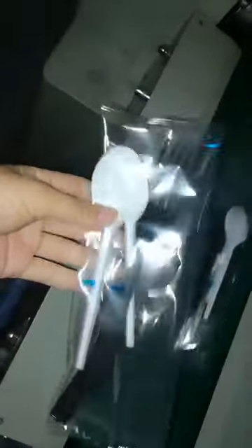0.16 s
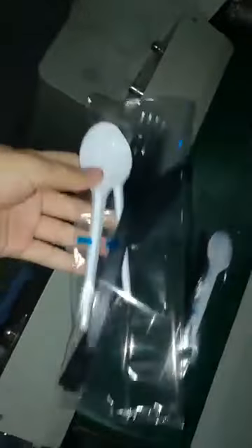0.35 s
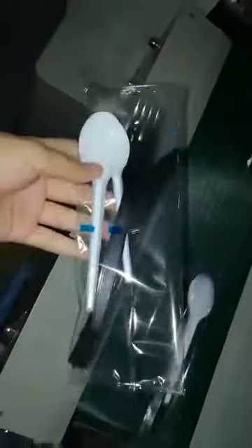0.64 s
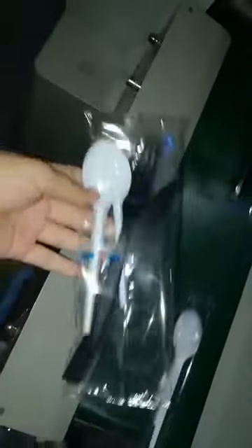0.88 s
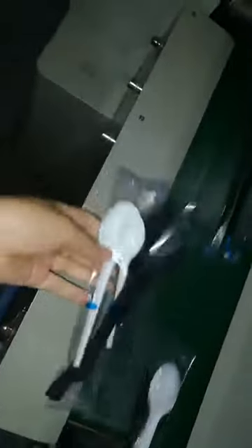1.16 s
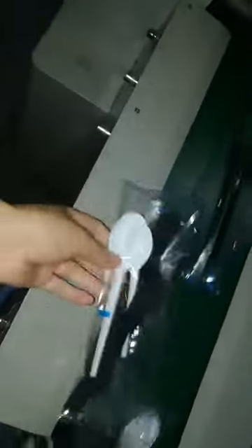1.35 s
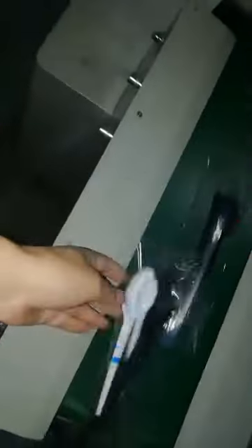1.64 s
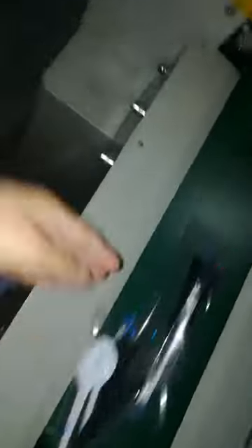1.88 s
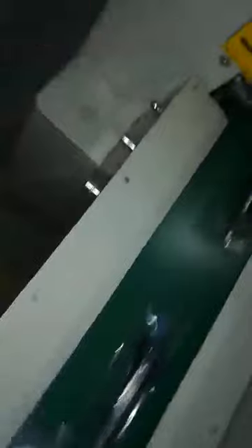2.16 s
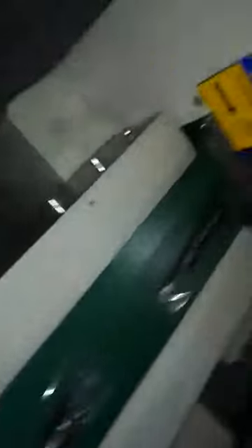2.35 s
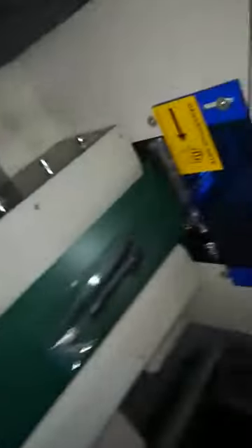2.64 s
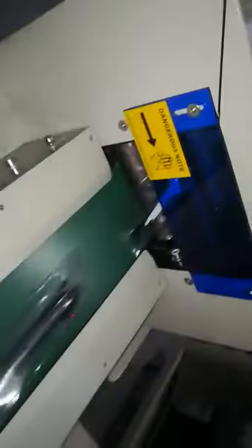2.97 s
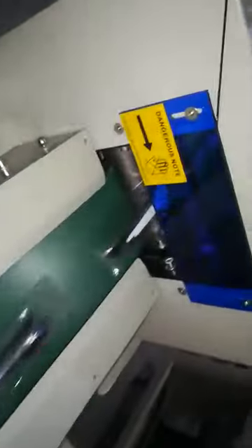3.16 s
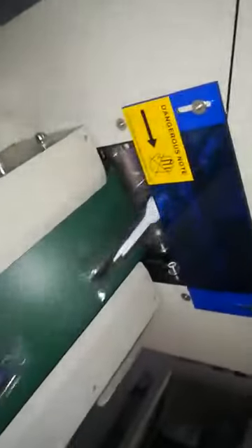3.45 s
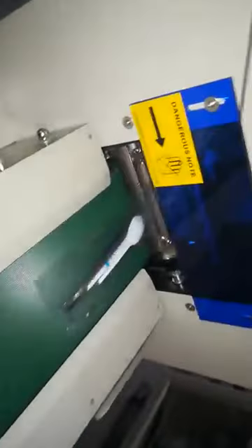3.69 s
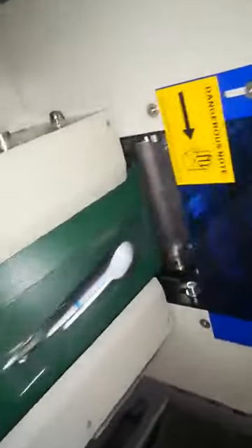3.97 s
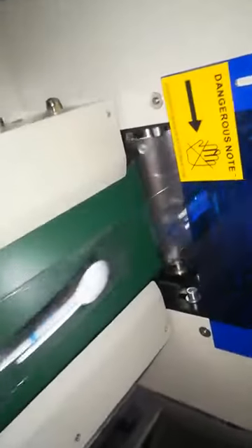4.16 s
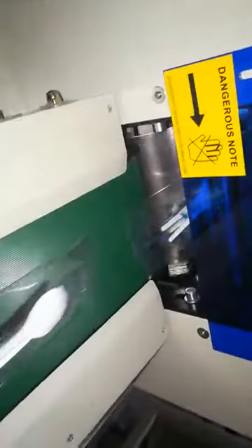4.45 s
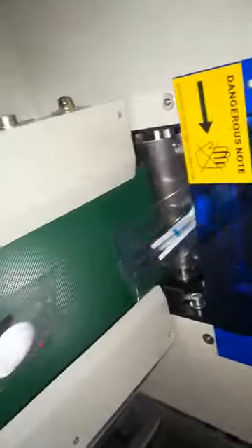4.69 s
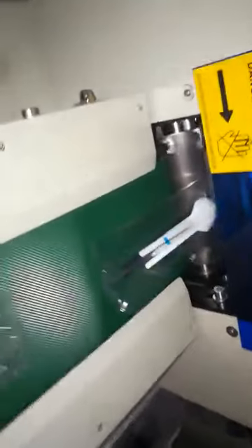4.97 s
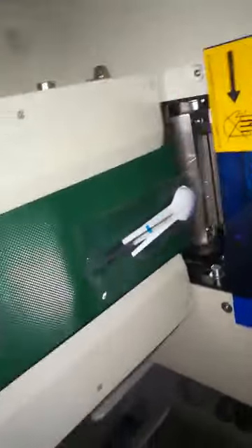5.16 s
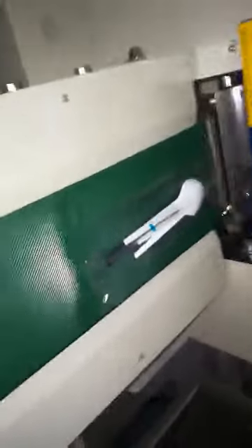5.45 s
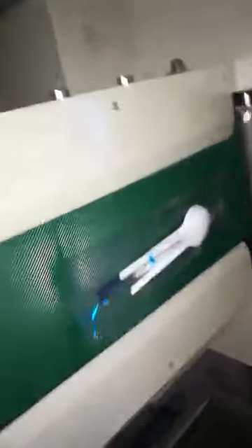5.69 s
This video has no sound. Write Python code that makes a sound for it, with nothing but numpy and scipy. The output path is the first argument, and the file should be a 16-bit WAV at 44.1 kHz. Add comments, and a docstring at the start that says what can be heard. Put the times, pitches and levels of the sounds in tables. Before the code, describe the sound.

Indoors, a handheld stereo phone is close above a packaging machine's belt. At 0.1 s a hard, rattling metal clack rings briefly. A fine bright air hiss runs throughout over rustling chains and rollers, a wavering low motor hum and a thin, very high electrical whine. A glassy band in the hiss rises and fades over the first 1.6 s as the hiss softens. Film crinkles faintly near 1.3 s; at 1.5 s a pack lands with short soft scuffs. From 2 to 3.5 s film drags roughly through rollers, with a snap and faint knock at 2.8 s. A quieter lull follows. Around 4.2 s hiss and rubbing surge and a broad, full roar sets in quickly; film snaps at 4.4 s, and from 4.5 to 4.9 s metal squeals in jumping high chirps that ring on. Another snap comes at 5 s, a light knock at 5.3 s, while the roar slowly eases to the end.

```python
"""A flow-wrap machine seals plastic cutlery in film, heard from a hand-held phone above its out-feed belt.
Air hisses and film rubs through the rollers, both made of coloured noise and random grains.
A hard clack opens the scene, a pack is laid on the belt, film snaps, and a rubbing metal part squeals briefly.
Behind them the gear rustles, the motor hums and the inverter whines, as noise bands and wandering sines;
a broad roar of noise joins in after four seconds. The phone has two microphone ports, left and right."""
import sys
import numpy as np
from scipy import signal
from scipy.fft import rfft, irfft
from scipy.io import wavfile
from scipy.ndimage import uniform_filter1d, minimum_filter1d

SR = 44100
rng = np.random.default_rng(int(sys.argv[2]) if len(sys.argv) > 2 else 0)


def to_wav(sig):
    """Store sig (one row per channel, or 1-D mono) as 16-bit WAV at the path in sys.argv[1].

    Samples outside -1..1 are clipped; the rate is SR.
    """
    pcm = np.clip(np.atleast_2d(sig), -1, 1) * 32767
    pcm = np.round(pcm).astype(np.int16)
    wavfile.write(sys.argv[1], SR, pcm.T)  # frames by channels


N = 256662
T = np.arange(N) / SR  # time in s

# spectrum of the escaping air, shape only: columns hz, density_db (per Hz)
AIR_SPECTRUM = [(1000, -17), (1700, -8.5), (2100, -2.5), (2700, -1), (4300, -1.5), (5200, -2), (5800, 6.5),
                (6600, -2), (8400, -1), (9600, -3.5), (11500, -9.5), (13200, -12.5), (15500, -27)]


def air():
    """Escaping air: a fine turbulent hiss with a little spatter."""
    spatter = undb(-8.5) * grains(rate=1500, spread_db=3.5)
    jet = from_left(noise() + spatter)
    low_skirt = [(100, -85), (500, -60)]
    hiss = colour(from_left(jet), low_skirt + list(AIR_SPECTRUM))
    return panels(hiss) * undb(0.72 * walk(45))


# bright band of the hiss: columns time_s, centre_hz, level_db
SHEEN_PATH = [(0, 6400, -32), (0.9, 8460, -41.5), (1.6, 8600, -51), (3.8, 8500, -57)]


def sheen():
    """A bright band of the hiss climbs and fades while the pack is turned in the hand."""
    centre_hz, level_db = curves(SHEEN_PATH)
    return undb(level_db) * band(centre_hz, width_hz=1600)


# spectrum of the rubbing film, shape only: columns hz, density_db (per Hz)
FILM_SPECTRUM = [(1500.0, -22.5), (2900.0, -13.5), (3550.0, -1.5), (4200.0, -5), (4900.0, 1), (5700.0, -1),
                 (6200.0, -8.5), (7600.0, -30), (12000.0, -27.5)]


def film():
    """Film dragged over steel: dense little slips, uneven in strength."""
    clicks = undb(-3.5) * grains(rate=3000, spread_db=4.5)
    slips = from_left(noise() + clicks)
    rubbing = colour(from_left(slips), [(600, -32)] + list(FILM_SPECTRUM))
    return panels(rubbing) * undb(1.0 * walk(45))


# packs dragged through the rollers: columns start_s, end_s, level_db
FILM_DRAGS = [(2.002, 2.42, -39), (2.371, 2.704, -34), (2.647, 3.547, -29.5), (2.8, 2.845, -25.5),
              (4.234, 5.3, -31.5), (4.455, 4.62, -34), (5.287, 5.357, -24), (5.645, 5.82, -32)]
FILM_IDLE_DB, DRAG_RISE_S, DRAG_FALL_S = -38, 0.034, 0.076


def drag():
    """Strength of the film's rubbing: the drags add their power to the light idle rub."""
    pulls = sum((undb(db) * swell(start, end, DRAG_RISE_S, DRAG_FALL_S)) ** 2
                for start, end, db in FILM_DRAGS)
    return np.sqrt(undb(FILM_IDLE_DB) ** 2 + pulls)


# the air jet as the phone moves about it: columns time_s, hiss_db, left_minus_right_db
JET_PATH = [(0, -28, -2), (0.8, -30, -2.5), (1.35, -32, -2.5), (1.65, -34.5, -3), (2.0, -32.5, 0),
            (2.6, -30, -1.5), (3.45, -30, 0), (3.75, -34.5, 2), (4.12, -35, 1.5), (4.24, -28, 5),
            (4.7, -28, -3.5), (5.82, -28, 0.5)]


def hiss():
    """Air jet and film rub share one shifting balance between the ports."""
    air_db, lean_db = curves(JET_PATH)
    return (undb(air_db) * air() + drag() * film()) * balance(lean_db)


# knocks on the frame: columns start_s, level_db (relative), rattle_t60_s, treble_db (relative to its body)
FRAME_KNOCKS = [(0.117, -9.5, 0.052, -17), (0.1202, -12, 0.05, -11), (0.1262, -6.5, 0.05, -5),
                (0.141, -19, 0.054, -2), (0.191, -20.5, 0.14, -19), (2.8047, -24, 0.19, -15),
                (5.33, -25, 0.11, -3)]
# ringing of the frame after a knock: columns pitch_hz, level_db (relative), t60_s
FRAME_RINGING = [(425, -42, .6), (840, -42, .45), (1513, -39, .3), (2842, -33, .3), (8856, -36, .4)]
# spectrum the frame gives to the rattle, shape only: columns hz, gain_db
FRAME_SPECTRUM = [(250, -33), (420, -23), (620, -16), (840, -2), (1250, -14), (1550, -3), (1850, -9),
                  (2250, -3), (3250, -1), (5200, 2.5), (6500, -11), (8500, -10), (15500, -37)]
# where the frame is heard: columns hz, left_minus_right_db
FRAME_BALANCE = [(500, 4), (2100, -2), (5200, 4.5), (12000, -1)]


def knocks():
    """Each knock is a short rattle of contacts that sets the steel frame ringing."""
    blows, strikes = 0, np.zeros(N)
    rattle = unit(noise() + undb(-5.5) * grains(rate=6800, spread_db=2.9))
    treble = colour(rattle, [(5000, -58), (7500, 16.5)])
    body = colour(rattle, [(5700, -1.0), (8000, -8)])
    for start, db, t60, treble_db in FRAME_KNOCKS:
        blows = blows + undb(db) * decay(start, t60) * (body + undb(treble_db) * treble)
        strikes[int(start * SR)] += undb(db)
    ring = sum(undb(db) * decay(0, t60) * np.sin(2 * np.pi * hz * T) for hz, db, t60 in FRAME_RINGING)
    clatter = undb(5.0) * colour(blows, FRAME_SPECTRUM)
    return lean(room(clatter + convolve(strikes, ring), wet_db=-13.0), FRAME_BALANCE)


# modes of the rubbing metal part: columns pitch_hz, left_minus_right_db
RUBBING_MODES = [(3425, -7), (5165, 7), (5726, 4), (8162, 9), (8800, -5), (11612, -4), (12172, -6),
                 (12834, -6)]
# squeals, each on one of those modes: columns start_s, end_s, pitch_hz, level_db
SQUEAL_EVENTS = [(4.472, 4.535, 5726, -23), (4.472, 4.555, 3425, -30), (4.526, 4.59, 8800, -21.5),
                 (4.526, 4.555, 12172, -35), (4.526, 4.555, 12834, -38), (4.5, 4.595, 5165, -28.5),
                 (4.575, 4.66, 5726, -24), (4.595, 4.645, 8162, -20), (4.672, 4.71, 8162, -20),
                 (4.68, 4.76, 3425, -34), (4.72, 4.81, 11612, -38), (4.727, 4.768, 8162, -18),
                 (4.745, 4.785, 5165, -33), (4.74, 4.87, 5726, -31)]
# ringing after a squeal, against the squeal's level; the level is that at 5 kHz
SQUEAL_RING_DB, SQUEAL_RING_DB_PER_OCTAVE, SQUEAL_RING_T60_S = -8, -4, 1.6


def squeal(rise_s=0.008, fall_s=0.017):
    """Friction locks on to mode after mode; each swells, flutters and rings on, high ones more softly."""
    out = 0
    for hz, lean_db in RUBBING_MODES:
        ring = undb(SQUEAL_RING_DB + SQUEAL_RING_DB_PER_OCTAVE * np.log2(hz / 5000))
        strengths = []
        for start, end, mode_hz, db in SQUEAL_EVENTS:
            if mode_hz == hz:
                driven = swell(start, end, rise_s, fall_s)
                released = ring * decay(end, SQUEAL_RING_T60_S)
                strengths.append(undb(db) * np.maximum(driven, released))
        flutter = undb(2.2 * walk(55))
        tone = np.max(strengths, axis=0) * flutter * sine(hz + 12 * walk(120))
        out = out + tone * balance(lean_db)
    return room(out, wet_db=-13)


# crisp snaps of the film: columns start_s, level_db, t60_s
FILM_SNAPS = [(2.822, -31, 0.088), (4.3656, -29, 0.12), (4.9822, -24, .03)]
# softer crinkling of the film: columns start_s, end_s, level_db
FILM_CRINKLES = [(1.267, 1.38, -38), (4.151, 4.465, -33), (4.49, 4.8, -39)]
CRINKLE_SLEW_S = 0.042
# spectrum of snaps and crinkles, shape only: columns hz, density_db (per Hz)
SNAP_SPECTRUM = [(1500, -21), (4000, -24), (7500, -17), (10500, 4.5), (12500, -3), (15500, -12)]


def snaps():
    """Creases in the packs snap over, and the film crinkles softly as it bends."""
    crisp = sum(undb(db) * decay(start, t60) for start, db, t60 in FILM_SNAPS)
    soft = sum(undb(db) * swell(start, end, CRINKLE_SLEW_S, CRINKLE_SLEW_S)
               for start, end, db in FILM_CRINKLES)
    crackle = unit(colour(noise() + grains(rate=8600, spread_db=5.0), SNAP_SPECTRUM))
    return room((crisp + soft) * crackle, wet_db=-6.0)


# scuffs of the pack on the belt: columns start_s, level_db
PACK_SCUFFS = [(1.488, -31.5), (1.506, -38), (1.526, -40)]
SCUFF_HZ, SCUFF_T60_S = 3220, 0.11


def pack_scuffs():
    """The pack is laid on the belt: the cutlery shifts in its film in a few short scuffs."""
    strength = sum(undb(db) * decay(start, SCUFF_T60_S) for start, db in PACK_SCUFFS)
    return room(strength * band(SCUFF_HZ, width_hz=670), wet_db=-8)


# spectrum of the running gear, shape only: columns hz, density_db (per Hz)
GEAR_SPECTRUM = [(200, -19.5), (400, -5), (520, -2), (680, -6), (880, -3), (1080, 0), (1300, -4),
                 (2050, -2), (2800, -9), (5000, -9.5), (12000, -17.5)]
# how unlike the gear's rustle is at the two ports: columns hz, side_minus_mid_db
GEAR_WIDTH = [(280, -3), (430, 2), (580, 2.5), (900, -1), (1500, 0.5), (2500, 1.5)]
# path of the echo from the machine bed: columns time_s, extra_delay_ms
BED_ECHO_PATH = [(0, 0.65), (1.25, 0.86), (1.75, 0.6), (2.15, 0.95), (3.2, 1.2), (5.82, 1.11)]
# loudness of the running gear: columns time_s, level_db
GEAR_LOUDNESS = [(0, -42.5), (1.4, -44.5), (4.1, -43), (5.82, -38.5)]


def gear():
    """Chains and rollers rustle; the dull echo from the bed cuts a notch that moves with the phone."""
    clinks = undb(-5.5) * grains(rate=440, spread_db=2.0)
    rustle = colour(spread(noise() + clinks, GEAR_WIDTH), GEAR_SPECTRUM) * undb(1.13 * walk(24.85))
    dull = signal.sosfiltfilt(signal.butter(3, 1000, fs=SR, output="sos"), rustle)
    echo = undb(-7.5) * delayed(dull, *curves(BED_ECHO_PATH))
    return undb(curves(GEAR_LOUDNESS)) * unit(rustle + echo)


# shaft tones of the motors, close enough to beat: columns pitch_hz, level_db (relative)
SHAFT_TONES = [(172.4, -8.5), (175.6, -3), (177.8, 0.5), (182.6, -3)]
# the hum swells and sinks: columns time_s, level_db
SHAFT_LOUDNESS = [(0, -58), (0.16, -46.5), (1.07, -55.5), (1.5, -49), (1.77, -59.5), (1.96, -47.5),
                  (2.9, -59.5), (3.1, -47), (4.1, -51.5), (4.25, -43.5), (4.65, -51), (4.85, -42.5),
                  (5.3, -51), (5.82, -43)]
# deeper tones of the drive: columns pitch_hz, level_db (relative)
LOW_TONES = [(97, -3.5), (107.3, -2.5), (143, -10)]
# spectrum of the boom, shape only: columns hz, density_db (per Hz)
BOOM_SPECTRUM = [(20, -17), (75, -9), (103, -4.5), (125, -8.5), (172, -4.5), (260, 0.5), (340, -10),
                 (420, -17.5), (900, -29)]
# a drone in the cabinet that wavers, comes and goes: columns time_s, centre_hz, level_db
CABINET_DRONE = [(0.5, 265, -68), (0.8, 279, -49.5), (1.35, 255.4, -52), (1.75, 290, -49),
                 (2.15, 280.7, -50), (3.6, 290, -61), (5.7, 335.3, -55)]
# the drive grows louder by the load figures as the roar sets in
LOW_HUM_DB, LOW_HUM_LOAD_DB = -61, 6.5
BOOM_DB, BOOM_LOAD_DB = -49, 6.5


def motor(load):
    """Beating, wandering shaft tones over the lumpy boom and wavering drone of the cabinet."""
    shaft = undb(curves(SHAFT_LOUDNESS)) * tones(SHAFT_TONES, wander_hz=2.58, waver_db=2.5)
    low_db = LOW_HUM_DB + LOW_HUM_LOAD_DB * load
    low = undb(low_db) * tones(LOW_TONES, wander_hz=1.87, waver_db=1.5)
    drone_hz, drone_db = curves(CABINET_DRONE)
    drone = undb(drone_db) * band(drone_hz, width_hz=23.4)[0]  # alike at both ports
    boom_db = BOOM_DB + BOOM_LOAD_DB * load + 1.9 * walk(9.1)
    return undb(boom_db) * bulky(BOOM_SPECTRUM) + shaft + low + drone


# the inverter's carrier and its sidebands: columns pitch_hz, level_db (relative)
WHINE_TONES = [(9808, -11), (9962, -4), (9999, 0), (10024, -6), (10035, -7), (10189, -11)]
# the whine sinks at first, then grows as the phone nears the cabinet: columns time_s, level_db
WHINE_LOUDNESS = [(0, -44), (2.2, -52), (3.0, -45), (3.8, -42), (5.82, -36.5)]


def whine():
    """The inverter's switching carrier and sidebands sing as high, slightly wandering lines."""
    return undb(curves(WHINE_LOUDNESS)) * tones(WHINE_TONES, wander_hz=3.97, waver_db=3)


# spectrum of the roar, shape only: columns hz, density_db (per Hz)
ROAR_SPECTRUM = [(20, -7), (60, -3), (100, 9.5), (240, 7.5), (650, 1), (1300, 4.5), (2200, -1), (3500, 7.5),
                 (7000, -1), (10000, 6), (14000, -33)]
ROAR_START_S, ROAR_RISE_S, ROAR_HOLD_S = 4.16, 0.059, 0.89  # the hold counts from the start
ROAR_DB, ROAR_FADE_DB_PER_S = -32.5, 4.5


def roar(load):
    """Broad noise from a large body sets in quickly, holds, then eases off."""
    eased_db = ROAR_FADE_DB_PER_S * np.maximum(T - ROAR_START_S - ROAR_HOLD_S, 0)
    return load * undb(ROAR_DB - eased_db) * panels(bulky(ROAR_SPECTRUM))


def panels(x, count=12):
    """Reflections from nearby panels ripple the spectrum; the ripple shifts as the hand sways."""
    echoes = 0
    for k in range(count):
        source = x[::-1] if k % 2 else x  # every other echo swaps the ports
        delay_ms = rng.uniform(0.808, 10) + 0.075 * walk(1.504)
        echoes = echoes + delayed(source, delay_ms)
    return unit(x + undb(-14.5) * echoes)


ROOM_T60_S = 0.52


def room(x, wet_db):
    """Add the diffuse tail of the workshop, which loses its treble."""
    tail = colour(noise() * decay(0.0024, ROOM_T60_S), [(3000, 12.6), (12000, 3.0)])[:, :SR]
    return x + undb(wet_db) * convolve(x, tail / np.sqrt(np.sum(tail ** 2) / 2))


def undb(db):
    """Decibels to gain."""
    return 10 ** (np.asarray(db) / 20)


def unit(x):
    """Scale to rms 1."""
    return x / np.sqrt(np.mean(x ** 2))


def curves(table):
    """The columns of a table, joined by straight lines in time."""
    time_s, *columns = np.transpose(table)
    return [np.interp(T, time_s, column) for column in columns]


def noise():
    """Unrelated noise at the two ports."""
    return rng.standard_normal((2, N))


def grains(rate, spread_db):
    """A random rain of tiny clicks, rate a second at each port, most weak and a few strong."""
    hit = rng.random((2, N)) < rate / SR
    return unit(hit * noise() * undb(spread_db * np.minimum(rng.exponential(size=N), 5)))


def walk(rate):
    """Slow chance with spread 1, changing about rate times a second."""
    steps = rng.standard_normal(4096)
    return unit(np.interp(T * rate, np.arange(len(steps)), steps))


def sine(hz):
    """A sine whose pitch may move."""
    return np.sin(2 * np.pi * np.cumsum(hz) / SR)


def tones(table, wander_hz, waver_db):
    """Steady lines that drift a little in pitch and strength."""
    return unit(sum(undb(db + waver_db * walk(6.4)) * sine(hz + wander_hz * walk(9)) for hz, db in table))


def band(hz, width_hz):
    """Noise in one resonance whose centre may move."""
    lowpass = signal.butter(2, width_hz / 2, fs=SR, output="sos")
    slow = signal.sosfilt(lowpass, noise() + 1j * noise())
    carrier = np.exp(2j * np.pi * np.cumsum(hz * np.ones(N)) / SR)
    return unit(np.real(slow * carrier))


def bulky(table):
    """Noise from a large body: its bass reaches both ports alike, its treble does not."""
    side_table = [(50, -35), (120, -19), (190, -13.5), (280, -11.5), (450, 0.0)]
    return unit(colour(spread(noise(), side_table), table))


def decay(start, t60):
    """A sudden start that falls 60 dB in t60."""
    age = T - start
    return (age >= 0) * np.exp(-np.log(1000) * np.clip(age / t60, 0, 10))


def swell(start, end, rise_s, fall_s):
    """Rise from the start, hold, and fall away after the end."""
    rise = 1 - np.exp(-np.maximum(T - start, 0) / rise_s)
    return rise * np.exp(-np.clip((T - end) / fall_s, 0, 20))


def spectrum(table, size=4096):
    """A (hz, db) table on the bins of a short transform."""
    hz, db = np.transpose(table)
    return np.interp(np.log(np.fft.rfftfreq(size, 1 / SR) + 1), np.log(hz), db)


def convolve(x, response):
    """Pass a sound through one response, or one for each port."""
    return signal.oaconvolve(np.atleast_2d(x), np.atleast_2d(response), axes=1)[:, :N]


def colour(x, table):
    """Causal filter with the given spectrum, built from its cepstrum."""
    cepstrum = irfft(np.log(undb(spectrum(table))))
    half = len(cepstrum) // 2
    cepstrum[1:half] *= 2  # fold the later half on to the earlier: minimum phase
    cepstrum[half + 1:] = 0
    return convolve(x, irfft(np.exp(rfft(cepstrum))))


def delayed(x, delay_ms):
    """Each port's sound, late by a delay that may move."""
    return np.array([np.interp(T - delay_ms / 10 ** 3, T, port, left=0) for port in x])


def balance(lean_db):
    """Gains of the left and right ports for a left minus right level."""
    return undb(np.array([[.5], [-.5]]) * lean_db)


def spread(x, side_table):
    """Share two unrelated sounds between the ports: one alike in both, one opposed."""
    return x[0] + colour(x[1], side_table) * np.array([[1], [-1]])


# the straight path of the hiss: its lag at the right port and its level against the scattered sound
PORT_LAG_S, DIRECT_DB = 0.00043, -10


def from_left(x):
    """Part of the sound comes straight to the phone and reaches the right port a little later."""
    left = x[0] * np.hypot(1, undb(DIRECT_DB))  # keeps the ports equally loud
    right = x[1] + undb(DIRECT_DB) * np.roll(x[0], round(PORT_LAG_S * SR))
    return unit(np.array([left, right]))


def lean(x, table):
    """Share each pitch between the ports by a (hz, left_minus_right_db) table, keeping its power."""
    hz, lean_db = np.transpose(table)
    common_db = 10 * np.log10((undb(lean_db) + undb(-lean_db)) / 2)
    return np.vstack([colour(port, np.transpose([hz, side * lean_db / 2 - common_db]))
                      for port, side in zip(x, (1, -1))])


def limit(x, size=129):
    """Turn both ports down for a few milliseconds around a peak that would overload."""
    gain = minimum_filter1d(1 / np.maximum(np.abs(x).max(axis=0) / .95, 1), size)
    return x * uniform_filter1d(gain, size)


def scene():
    """All the parts of the machine around the phone."""
    load = np.clip((T - ROAR_START_S) / ROAR_RISE_S, 0, 1)  # 0 before the roar, 1 once it has set in
    near = hiss() + sheen() + knocks() + squeal() + snaps() + pack_scuffs()
    return near + gear() + motor(load) + whine() + roar(load)


# the two microphone ports: columns hz, left_minus_right_db
PORT_BALANCE = [(400, 0), (700, 1), (1400, 0), (2100, -1.5), (2900, -9), (3800, -3.5), (5200, 11),
                (6300, -6.5), (7300, -1), (8500, -13), (11000, -25), (15000, -7.5)]
TOP_HZ = 15700


def record(dry):
    """The ports share the sound differently at each pitch; the phone limits the peaks and cuts the top."""
    limited = limit(lean(dry, PORT_BALANCE))
    return signal.sosfilt(signal.ellip(10, .2, 80, TOP_HZ, fs=SR, output="sos"), limited)


dry = scene()
out = record(dry)
to_wav(out)
```